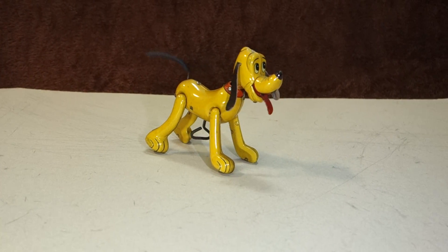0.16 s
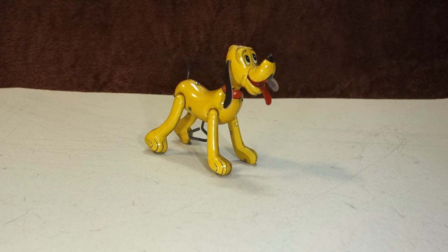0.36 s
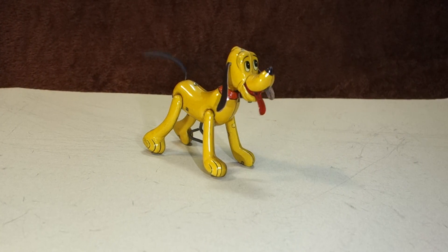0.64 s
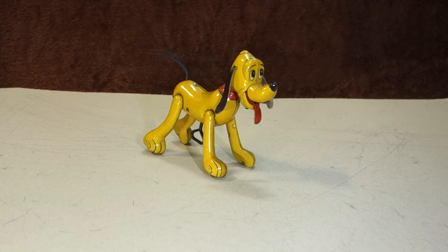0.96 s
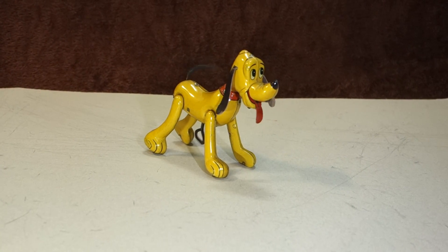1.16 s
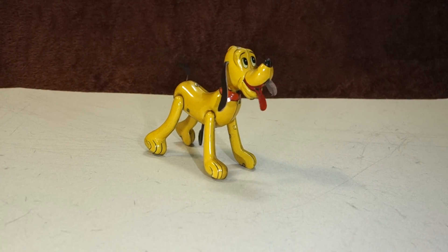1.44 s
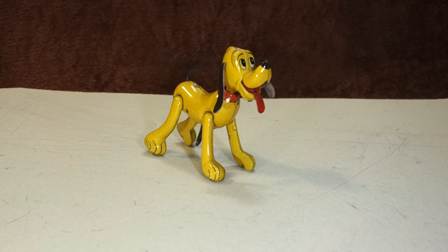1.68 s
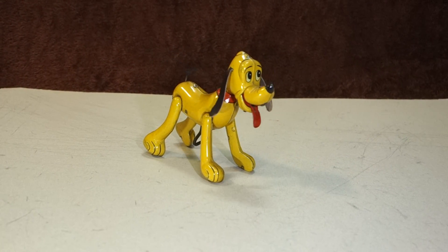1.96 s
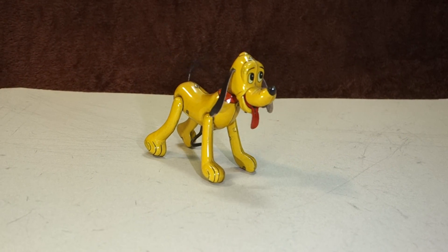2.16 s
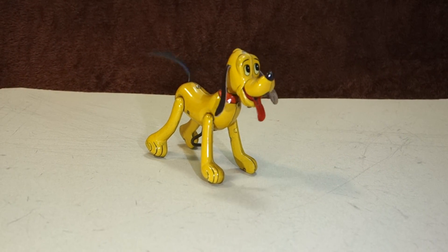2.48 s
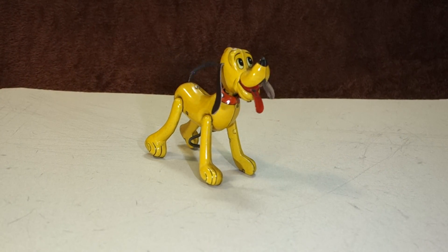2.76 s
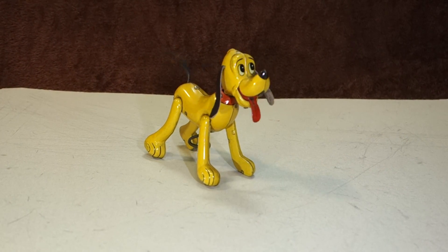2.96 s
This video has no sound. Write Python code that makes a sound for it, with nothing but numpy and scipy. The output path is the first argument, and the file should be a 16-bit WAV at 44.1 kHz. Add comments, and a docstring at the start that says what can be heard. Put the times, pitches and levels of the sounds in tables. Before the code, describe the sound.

A clockwork tin toy is already running at 0 s, its loose parts clashing brightly about 17 times a second. The chatter drops around 0.3 s, swells to its strongest near 0.9-1.1 s, eases, rises again around 2.0-2.3 s, then weakens unevenly until about 3.1 s. Gears whirr, joints tick and feet knock dully on the table. Close, small room, short echo, faint low hum.

```python
"""In a small room, a clockwork tin dog shakes on a table, heard close up over a faint hum and soft room noise.
About 17 times a second its loose tin parts clash: a bright chatter, swelling and ebbing, of noise through metal modes.
Gears whirr and loose joints tick between the clashes, shaking the same thin parts and hollow body.
The feet knock dully on the table, often twice a cycle, as short bursts of low decaying sines."""
import sys
import numpy as np
from scipy import signal
from scipy.fft import rfft, irfft, next_fast_len
from scipy.io import wavfile

SR = 44100
rng = np.random.default_rng(int(sys.argv[2]) if len(sys.argv) > 2 else 0)


def transcribe(u):
    """Save the signal u as a 16-bit wav file named by the first command-line argument.

    u: samples, shape (n,) or (channels, n), limited to [-1, 1]; the rate is SR.
    q: integer samples, one column per channel.
    """
    v = np.clip(np.atleast_2d(u).T, -1, 1)
    q = np.round(v * 32767).astype(np.int16)
    wavfile.write(sys.argv[1], SR, q)


N = 137592  # samples, 3.12 s


def undb(db):
    """Decibels to gain."""
    return 10 ** (np.asarray(db) / 20)


def unit(x):
    """Scale to an energy of 1 per channel."""
    return x / np.sqrt(np.sum(x ** 2) / len(np.atleast_2d(x)))


def curve(table, axis):
    """Gain over time along one dB column of a table whose first column is time."""
    rows = np.array(table)
    return undb(np.interp(np.arange(N) / SR, rows[:, 0], rows[:, axis]))


def fade(t, t60):
    """Exponential decay that drops 60 dB in t60 seconds."""
    return np.exp(-np.log(1000) * t / t60)


def colour(x, points):
    """Shape a sound by (frequency [Hz], level [dB]) points with a causal, minimum-phase filter."""
    size = next_fast_len(2 * len(x))
    size += size % 2
    hz, db = np.array(points).T
    bins_hz = np.linspace(1, SR / 2, size // 2 + 1)
    log_gain = np.log(undb(np.interp(np.log(bins_hz), np.log(hz), db)))
    # folding the cepstrum onto positive times makes the filter causal
    cepstrum = irfft(log_gain)[:size // 2]
    response = np.exp(2 * rfft(cepstrum, size) - cepstrum[0])
    return irfft(rfft(x, size) * response)[:len(x)]


def stereo(mid, side, pan_db):
    """Left and right from mid and side; pan_db is the gain of left over right."""
    pan = undb(np.array([[pan_db], [-pan_db]]) / 2)
    return np.array([mid + side, mid - side]) * pan


def add(out, start_s, sound):
    """Mix a sound in at a time."""
    i = max(int(start_s * SR), 0)
    part = out[..., i:i + sound.shape[-1]]
    part += sound[..., :part.shape[-1]]


def ring(push, response):
    """Play pushes through an impulse response of one or two channels."""
    return signal.fftconvolve(np.atleast_2d(push), np.atleast_2d(response), axes=1)[:, :N]


def wander(per_s):
    """Random values, per_s of them a second, joined by straight lines."""
    steps = rng.standard_normal(N // 4)
    return np.interp(np.arange(N) / SR * per_s, np.arange(len(steps)), steps)


# wavering hum: (time [s], fundamental [dB], octave [dB]), before the HUM_DB trim
HUM_WAVER = [(0.0, -78, -70), (0.04, -70, -62.5), (0.86, -65, -70.5), (1.09, -84, -59), (1.15, -70, -62),
             (1.32, -68.5, -70), (1.51, -87, -66.5), (1.66, -77, -67.5), (2.45, -72, -64.5),
             (2.48, -81, -62), (2.97, -70, -63.5), (3.12, -81, -81)]
# spectrum of the room noise: (frequency [Hz], relative level [dB])
ROOM_NOISE_COLOUR = [(20, -26), (45, -16), (70, -4), (130, -0.5), (220, -0.5), (330, -5), (600, -5.5),
                     (1500, -13.5), (5000, -22), (16000, -24)]
HUM_HZ, HUM_DB, HUM_FIFTH_DB = 48.3, -0.5, -66
NOISE_DB, NOISE_SIDE_DB = -56.5, -15


def background():
    """A low hum with wavering fundamental and octave and a steady fifth harmonic, over filtered noise."""
    turn = 2 * np.pi * HUM_HZ * np.arange(N) / SR
    wavering = curve(HUM_WAVER, axis=1) * np.sin(turn) + curve(HUM_WAVER, axis=2) * np.sin(2 * turn)
    hum = undb(HUM_DB) * wavering + undb(HUM_FIFTH_DB) * np.sin(5 * turn)
    mid, side = (unit(colour(rng.standard_normal(N), ROOM_NOISE_COLOUR)) * np.sqrt(N) * undb(NOISE_DB)
                 for _ in range(2))
    return stereo(np.sqrt(2) * hum + mid, undb(NOISE_SIDE_DB) * side, 0)


RATTLE_PER_S, RATTLE_SPREAD_DB = 140, 4.5
TICK_DECAY_S = 0.0042  # amplitude time constant of joint ticks and bounces


def loose_joints():
    """Power of the uneven little ticks of loose joints; mean 1."""
    power, t = np.zeros(N), np.arange(SR // 50) / SR
    tick = np.exp(-2 * t / TICK_DECAY_S)
    for k, (slip, size) in enumerate(rng.standard_normal((N // 150, 2))):
        strength = undb(RATTLE_SPREAD_DB * np.minimum(size, 1)) ** 2
        add(power, (k + slip / 2) / RATTLE_PER_S, strength * tick)
    return power / power.mean()


CHATTER_SPREAD_DB, CHATTER_GRAIN_S = 2.5, .0005


def roughness():
    """Gain of contacts that make and break within a millisecond; rms 1."""
    return unit(undb(CHATTER_SPREAD_DB * wander(1 / CHATTER_GRAIN_S))) * np.sqrt(N)


# loose tin parts clashing: (time [s], bright chatter [dB], hollow body [dB]), before the level trims
TIN_CLASHES = [(0.0271, -31.5, -37), (0.084, -31.5, -38.5), (0.1382, -33, -36.5), (0.1862, -36.5, -44),
               (0.247, -45, -45.5), (0.303, -52.5, -52), (0.3513, -49, -48), (0.4563, -45.5, -48.5),
               (0.511, -42, -48.5), (0.5626, -41.5, -47), (0.615, -35.5, -41.5), (0.6702, -32.5, -42),
               (0.7217, -42, -51), (0.7764, -32.5, -42), (0.8307, -33.5, -41), (0.8847, -29.5, -35.5),
               (0.9399, -31, -37.5), (0.9977, -30, -38.5), (1.055, -29.5, -37), (1.1115, -32, -41),
               (1.1703, -34, -39.5), (1.2273, -32, -43), (1.2821, -34.5, -44.5), (1.3372, -39, -48),
               (1.396, -35, -43.5), (1.4542, -37, -43.5), (1.5142, -38, -43), (1.572, -34, -49),
               (1.63, -34.5, -51.5), (1.6904, -36.5, -41.5), (1.746, -36.5, -44), (1.8055, -36, -43.5),
               (1.8605, -40, -47), (1.9172, -38, -48), (1.9747, -33, -39.5), (2.0345, -32, -36),
               (2.0904, -33.5, -38), (2.151, -32.5, -40.5), (2.2116, -34, -40), (2.2725, -33, -40),
               (2.3328, -35, -42), (2.389, -37.5, -44), (2.4491, -35.5, -42.5), (2.509, -43.5, -49.5),
               (2.5735, -47, -62), (2.626, -36.5, -46.5), (2.6834, -43, -46), (2.7473, -38, -45),
               (2.8114, -42.5, -46), (2.8706, -41.5, -42.5), (2.933, -53, -47), (3.0018, -46, -46),
               (3.06, -41, -46.5)]
SETTLE_DB_PER_S, STIRRED_DB = 69, 1


def settling():
    """Gain of the running rattle: it falls after a clash, starting afresh each typical cycle."""
    t, starts = np.arange(N) / SR, np.array(TIN_CLASHES)[:, 0]
    cycle = np.median(np.diff(starts))
    last_clash = starts[np.maximum(np.searchsorted(starts, t) - 1, 0)]
    since = (t - last_clash) % cycle
    return undb(STIRRED_DB - SETTLE_DB_PER_S * since)


# strength of the running rattle: (time [s], thin parts [dB], hollow body [dB]), before the trims
RUNNING_RATTLE = [(0.0, -41.5, -44), (0.25, -46.5, -48.5), (0.44, -48, -48.5), (0.98, -42, -43.5),
                  (1.35, -47, -51), (1.61, -47, -51), (2.0, -44, -47), (2.15, -45, -47), (2.47, -49, -53.5),
                  (2.69, -48.5, -54), (2.81, -50.5, -52), (3.12, -47.5, -53)]


def running(ticks, stirred, rattle_db, whirr_db, axis):
    """Power of the joint ticks and the steady gear whirr, both settling after each clash."""
    strength = (stirred * curve(RUNNING_RATTLE, axis=axis)) ** 2
    return strength * (undb(rattle_db) ** 2 * ticks + undb(whirr_db) ** 2)


# parts bounce back after a clash: mean gap, level against the hardest clash,
# and how much weaker clashes make up in bounce [dB per dB under the hardest]
BOUNCE_GAP_S, BOUNCE_DB, BOUNCE_GAIN = 0.01, -11, 0.5


def clashes(chatter, level_db, bounces, axis):
    """Power of the clashes: a few milliseconds of chatter, two bounces and a dying buzz."""
    attack, hold, decay, tail_db, tail_decay = chatter
    power, t = np.zeros(N), np.arange(SR // 8) / SR
    rise = np.minimum(t / attack, 1) ** 2
    burst = rise * np.exp(-2 * np.maximum(t - attack - hold, 0) / decay)
    buzz = rise * undb(tail_db) ** 2 * np.exp(-2 * t / tail_decay)
    tick = np.exp(-2 * t / TICK_DECAY_S)
    hardest = max(row[axis] for row in TIN_CLASHES)
    for row, gaps in zip(TIN_CLASHES, bounces):
        start, clash_db = row[0], row[axis]
        hit = undb(clash_db + level_db) ** 2
        bounce = undb(clash_db + level_db + BOUNCE_DB + BOUNCE_GAIN * (hardest - clash_db)) ** 2
        add(power, start, burst * hit + buzz * bounce)
        for k, late in enumerate(np.cumsum(gaps)):
            add(power, start + late, bounce * tick / (k + 1))
    return power


MODE_SPREAD_DB, MODE_CHANGE_PER_S = 4, 40


def sheet(force, modes, points, ring_db, side_db, pan_db):
    """Sheet metal under tiny taps: a dense crack, and rings that vary as the point of contact moves."""
    t = np.arange(SR // 8) / SR
    click = 1. * (t == 0)
    crack = ring(force * rng.standard_normal((2, N)), unit(colour(click, points)))
    push, rings = force * rng.standard_normal((2, N)), 0
    for hz, db, t60 in modes:
        mode = undb(db) * unit(np.cos(2 * np.pi * hz * t) * fade(t, t60))
        rings = rings + ring(push * undb(MODE_SPREAD_DB * wander(MODE_CHANGE_PER_S)), mode)
    # balance the rings against the crack and keep the total energy
    rings = undb(ring_db) * unit(rings) * np.sqrt(np.sum(force ** 2))
    mid, side = (crack + rings) / np.hypot(1, undb(ring_db))
    return stereo(mid, undb(side_db) * side, pan_db)


# long rings of the small thin parts: (frequency [Hz], relative level [dB], t60 [s])
THIN_MODES = [(4770, -4, 0.031), (5140, -6.5, 0.033), (6966, 0, 0.01), (7446, -1.5, 0.013),
              (8218, 0, 0.016), (9750, -8, 0.048), (11180, -8, 0.053), (13160, -1.5, 0.016),
              (13700, -0.5, .018), (15600, -9, .025)]
# dense weaker modes between them: (frequency [Hz], relative level [dB])
THIN_COLOUR = [(500, -25), (2000, -8.5), (3300, -1.5), (4200, -5), (5000, 0), (6200, 0), (7400, 3),
               (9000, 0), (10400, -2.5), (13200, -1.5), (14700, -5.5), (16000, -2)]


def thin_parts(force):
    """Small thin tin parts: high, wide and bright sheet metal."""
    return sheet(force, THIN_MODES, THIN_COLOUR, ring_db=-6, side_db=-5, pan_db=-1)


# long rings of the hollow body: (frequency [Hz], relative level [dB], t60 [s])
HOLLOW_MODES = [(1100, -6, 0.064), (1256, -6, 0.076), (1507, -5.5, 0.083), (1686, -5, 0.053),
                (1987, 3, 0.051), (2095, -3.5, 0.08), (2369, 3.5, 0.046), (2550, -8.5, 0.11),
                (2932, -1, 0.041), (3107, -3.5, 0.044), (3394, -2, 0.074)]
# dense weaker modes between them: (frequency [Hz], relative level [dB])
HOLLOW_COLOUR = [(100, -24), (300, -11.5), (500, -1.5), (720, -3), (1250, 1.5), (1500, -1.5), (1830, -3.5),
                 (2400, 0), (2750, -3), (3300, -1.5), (4100, -9.5), (8000, -31.5)]


def hollow_body(force):
    """The hollow tin body: lower and narrower sheet metal."""
    return sheet(force, HOLLOW_MODES, HOLLOW_COLOUR, ring_db=-1.5, side_db=-14, pan_db=-2)


# one clash: (attack [s], hold [s], decay constant [s], tail against bounces [dB], tail decay constant [s])
THIN_CHATTER = (.0007, 0.00456, .003, -0.76, 0.028)
HOLLOW_CHATTER = (.002, 0.0053, 0.0065, 0, 0.036)
THIN_DB, HOLLOW_DB = 2, 2.5
RATTLE_DB, WHIRR_DB = -2, -3.5


def clatter():
    """Clashes, loose joints and gear whirr shake both the thin parts and the hollow body."""
    bounces = BOUNCE_GAP_S * (1 + (rng.random((len(TIN_CLASHES), 2)) - .5) / 2)
    ticks, grain, stirred = loose_joints(), roughness(), settling()
    thin = clashes(THIN_CHATTER, THIN_DB, bounces, axis=1)
    thin = thin + running(ticks, stirred, RATTLE_DB, WHIRR_DB, axis=1)
    hollow = clashes(HOLLOW_CHATTER, HOLLOW_DB, bounces, axis=2)
    hollow = hollow + running(ticks, stirred, RATTLE_DB, WHIRR_DB, axis=2)
    return thin_parts(grain * np.sqrt(thin)) + hollow_body(grain * np.sqrt(hollow))


# feet on the table: (time [s], relative level [dB])
FOOT_KNOCKS = [(0.0759, -6.5), (0.129, -6), (0.168, -0.5), (0.184, -4.5), (0.219, -5), (0.2398, -8),
               (0.2664, -1.5), (0.2884, -1), (0.3218, -7.5), (0.3405, -2.5), (0.3747, -1.5), (0.3961, -3),
               (0.43, -5.5), (0.4527, -6), (0.4819, -3.5), (0.5041, -2), (0.5352, -2), (0.5585, -1.5),
               (0.5863, 1.5), (0.615, -1), (0.6428, -1.5), (0.6673, -4.5), (0.6935, -2.5), (0.714, 0),
               (0.768, 1), (0.8322, -2), (0.8723, -4.5), (0.8891, -5.5), (0.9343, -4.5), (1.1065, -7),
               (1.1471, -4), (1.1691, -6.5), (1.1991, -7), (1.221, -7), (1.2501, -4), (1.2753, -4.5),
               (1.3102, -3), (1.3291, -2.5), (1.3873, -4.5), (1.4208, 1), (1.4459, -5), (1.48, -8.5),
               (1.5094, -6), (1.5405, -7), (1.5641, -5), (1.5962, -2.5), (1.623, -3), (1.6555, -5),
               (1.6877, -8), (1.713, -3.5), (1.7378, -3.5), (1.7745, -8), (1.7956, 0), (1.8144, -14),
               (1.8287, -1.5), (1.856, -4), (1.887, -3.5), (1.914, 0), (1.949, -2), (1.9661, -0.5),
               (2.019, -5.5), (2.0842, -4.5), (2.1112, -2), (2.1476, -2.5), (2.1752, -3), (2.2658, -3.5),
               (2.2949, -8.5), (2.3568, -10), (2.3875, -3), (2.4196, -10), (2.4455, -11.5), (2.475, -7),
               (2.5669, -10.5), (2.6224, -12), (2.652, -10.5), (2.6814, -10.5), (2.7122, -7.5),
               (2.7433, -4.5), (2.8063, -7), (2.8362, -4), (2.868, -7), (2.8969, -4), (2.9289, -8),
               (2.9613, -8.5), (2.9883, -4), (3.047, -4.5), (3.0783, -6.5), (3.1061, -4.5)]
# what a knock rings, before its small random changes:
# (frequency [Hz], level [dB], t60 [s], signed swing [gain])
FOOT_MODES = [(500.6, -33.5, 0.023, -0.99), (811.5, -46, 0.098, -0.9), (986.8, -39.5, 0.15, 1),
              (1039, -31, 0.022, 0.97), (1248, -44, 0.086, 0.87), (1467, -30, 0.0087, -1.06)]
KNOCK_DB, KNOCK_PAN_DB = 0.42, -1.8
KNOCK_DETUNE, KNOCK_MODE_SPREAD_DB = 0.0094, 1.1  # detune is a fraction of the frequency
CONTACT_HZ, KNOCK_LOW_HZ = 2550, 185  # soft contact dulls the top; a high-pass thins the bottom


def knocks():
    """Each soft landing of a foot rings the same low modes, a little differently."""
    out, t = np.zeros(N), np.arange(SR // 6) / SR
    chances = rng.standard_normal((len(FOOT_KNOCKS), len(FOOT_MODES), 2))
    for (start, level_db), chance in zip(FOOT_KNOCKS, chances):
        for (hz, db, t60, swing), (shift, size) in zip(FOOT_MODES, chance):
            gain = swing * undb(level_db + db + KNOCK_MODE_SPREAD_DB * size)
            tone = np.sin(2 * np.pi * hz * (1 + KNOCK_DETUNE * shift) * t)
            add(out, start, gain * tone * fade(t, t60))
    out = signal.sosfilt(signal.butter(4, CONTACT_HZ, fs=SR, output="sos"), out)
    out = signal.sosfilt(signal.butter(2, KNOCK_LOW_HZ, "high", fs=SR, output="sos"), out)
    return stereo(undb(KNOCK_DB) * out, 0, KNOCK_PAN_DB)


ROOM_T60_S, ROOM_DB, ROOM_DELAY_S = 0.26, -11.5, 0.0041


def room(x):
    """Short diffuse echo of a furnished room: decaying noise, independent left and right."""
    t = np.arange(SR // 2) / SR
    tail = rng.standard_normal((2, len(t))) * fade(t, ROOM_T60_S) * (t > ROOM_DELAY_S)
    return x + undb(ROOM_DB) * ring(x.mean(axis=0), unit(tail))


def scene():
    """The toy in its room."""
    return room(knocks() + clatter()) + background()


TOP_HZ = 15780


def record(dry):
    """The recorder cuts the top with a steep low-pass."""
    return signal.sosfilt(signal.ellip(10, .2, 80, TOP_HZ, fs=SR, output="sos"), dry)


dry = scene()
out = record(dry)
transcribe(out)
```